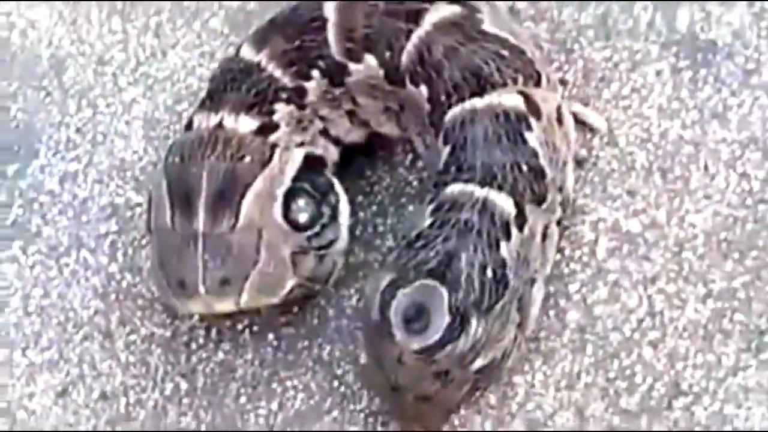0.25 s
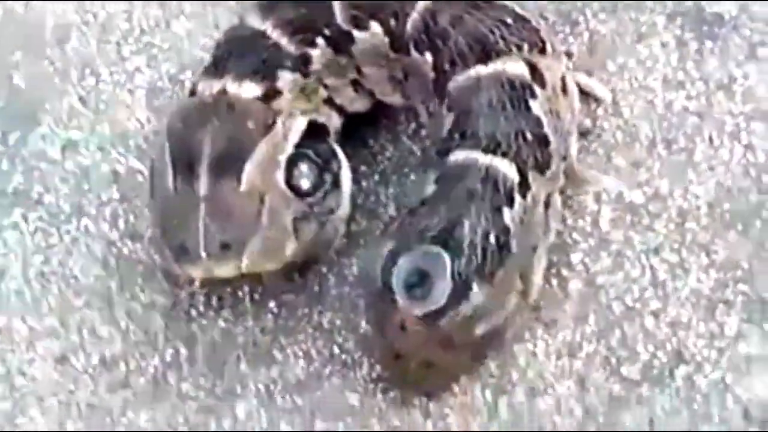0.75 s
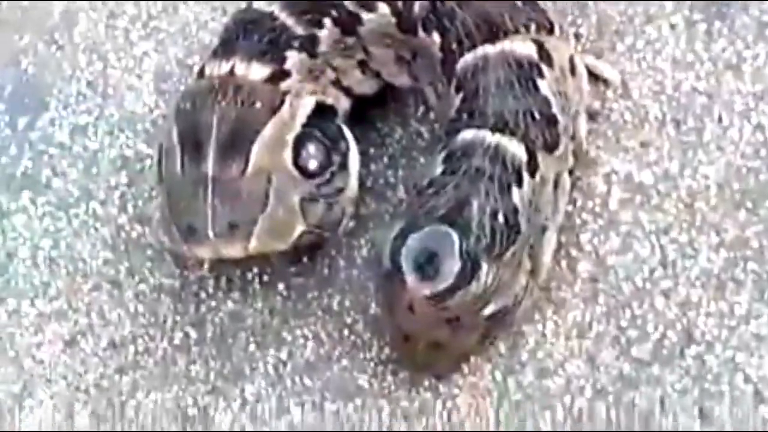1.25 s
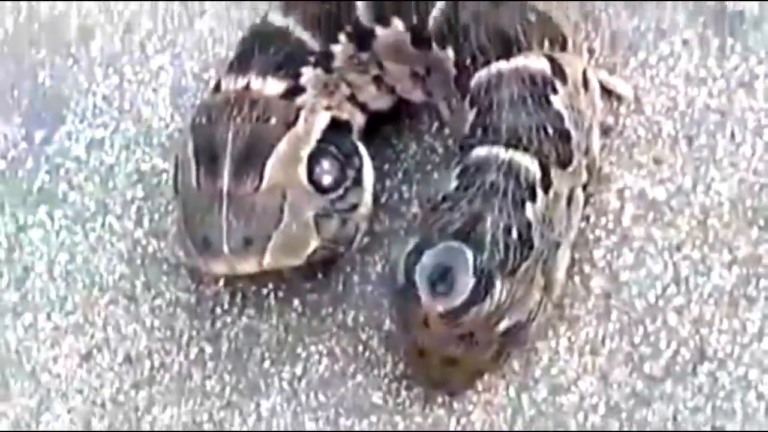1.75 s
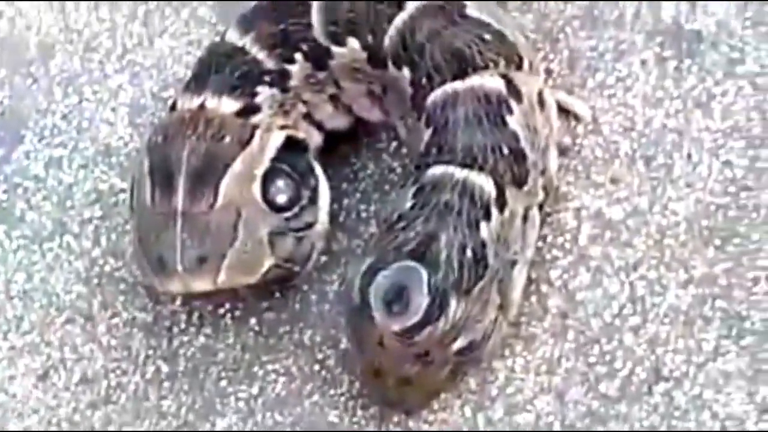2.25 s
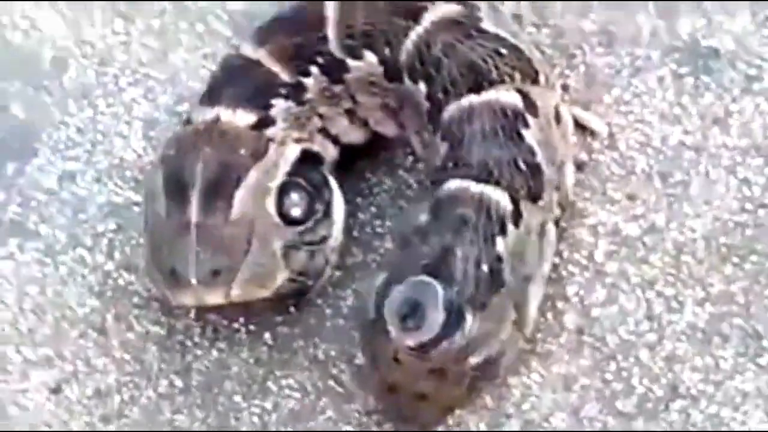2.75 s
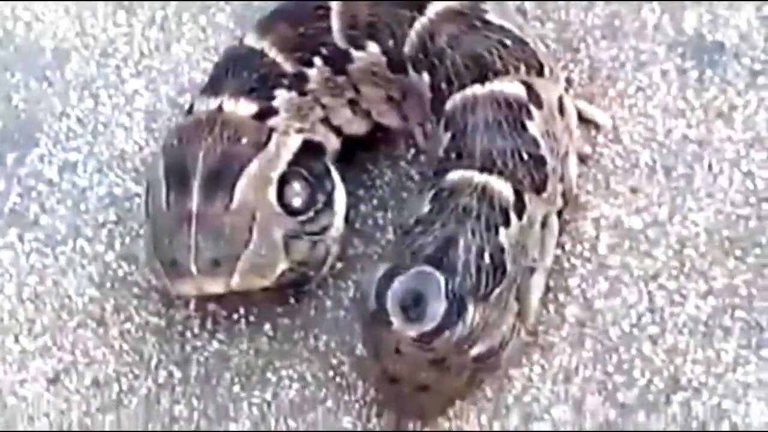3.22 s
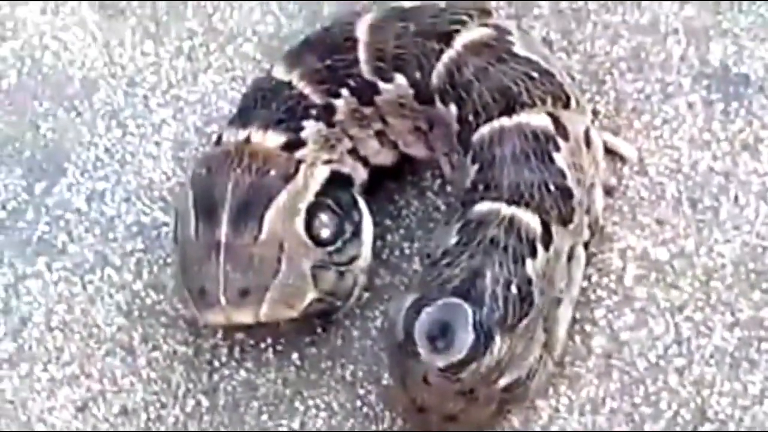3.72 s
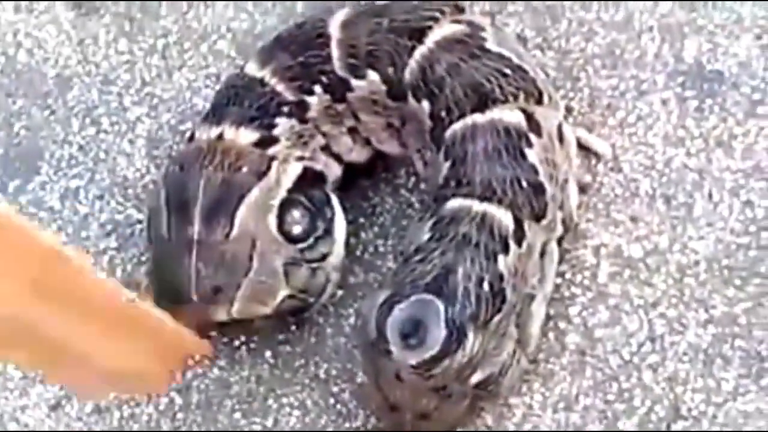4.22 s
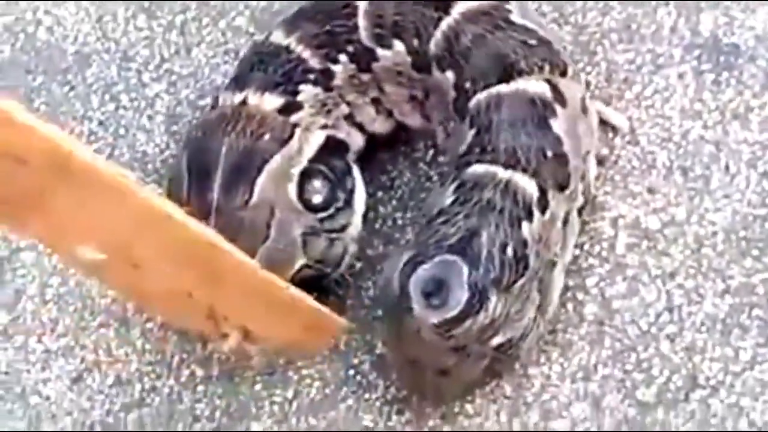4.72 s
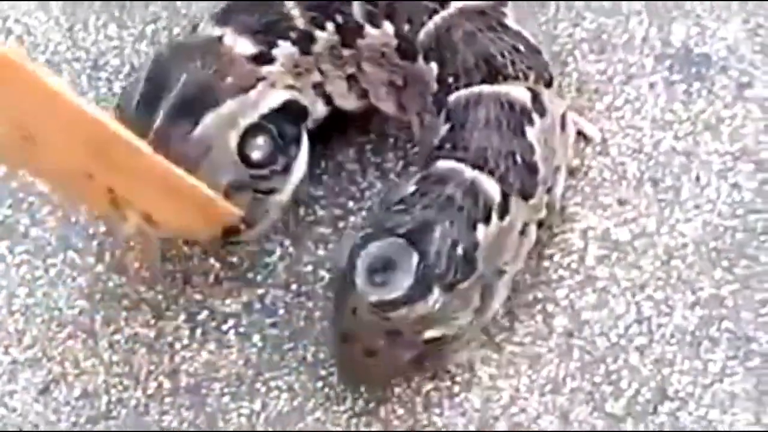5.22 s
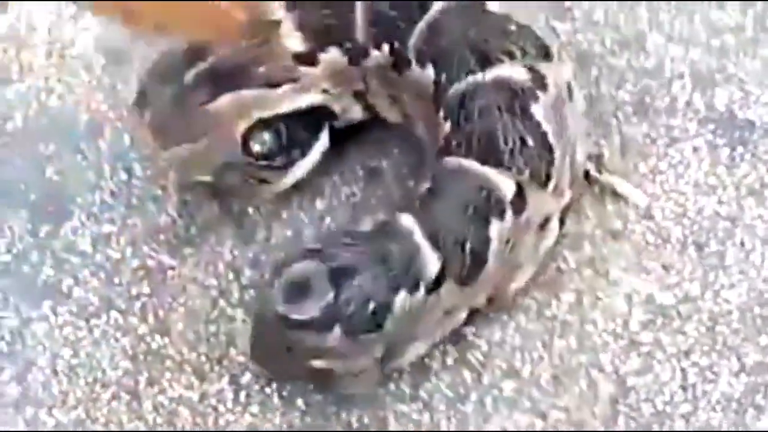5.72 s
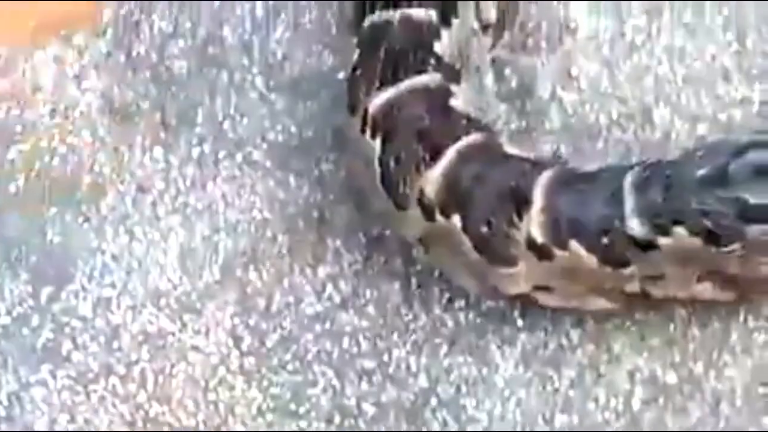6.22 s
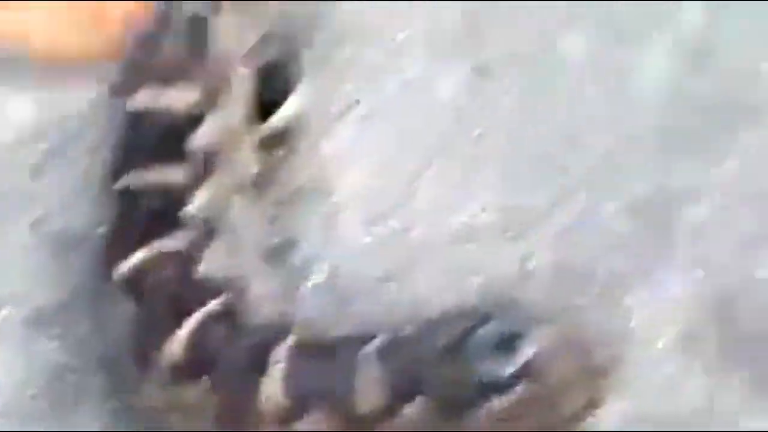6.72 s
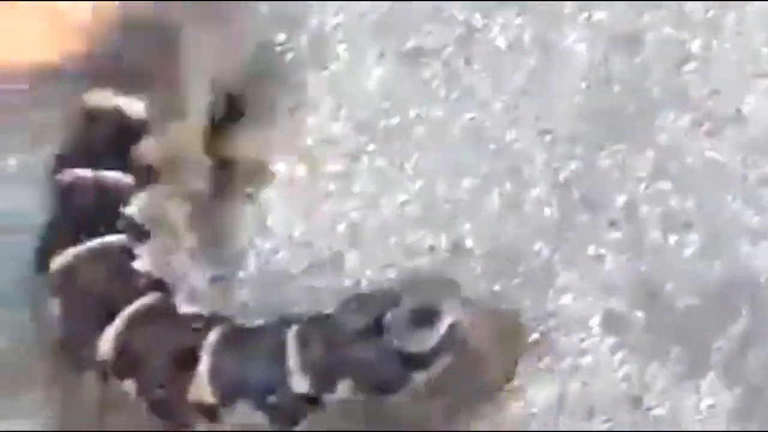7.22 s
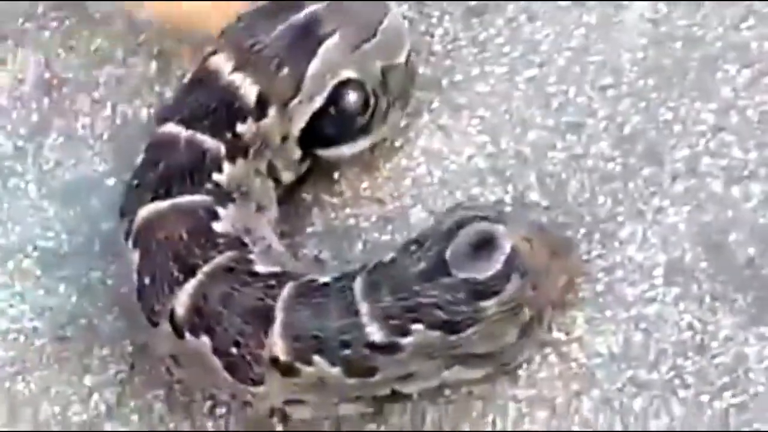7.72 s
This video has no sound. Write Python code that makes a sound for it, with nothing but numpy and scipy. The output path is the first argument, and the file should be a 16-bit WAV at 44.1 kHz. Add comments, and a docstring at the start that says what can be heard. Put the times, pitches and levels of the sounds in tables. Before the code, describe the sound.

Slow irregular knocks, like hard soles or a stick striking rough concrete, stand out sharply from a nearly silent low hum. The first comes immediately, with light taps after it; the strongest is near the middle and the weakest about six seconds in. Fine grit crackles around two seconds, and bright scraping ticks follow the last knock. One near microphone catches short hard-walled reverberation.

```python
"""Over a faint low hum and thin hiss, hard soles land slowly and unevenly on gritty concrete in a bare room.
A few milliseconds of faint grainy noise lead into each heel knock, a short dead ring of coloured noise, and
the flat of the sole slaps after it. The room answers with scattered echoes and a noise tail, and its lowest
mode booms on as a decaying sine. Light taps fall among the steps; scrapes and ticks of filtered noise grains,
then faint squeaks, join in."""
import sys
import numpy as np
from scipy import signal
from scipy.fft import rfft, irfft, next_fast_len
from scipy.io import wavfile
from scipy.ndimage import uniform_filter1d

SR = 44100
rng = np.random.default_rng(int(sys.argv[2]) if len(sys.argv) > 2 else 0)


def unload_wav(signal):
    """Save mono or channel-first audio to the path in sys.argv[1] as 16-bit WAV at rate SR, clipped to [-1, 1]."""
    wavfile.write(
        sys.argv[1],
        SR,
        np.round(np.clip(np.atleast_2d(signal).T, -1, 1) * 32767).astype(np.int16),
    )


N = 351029

# Steps, heel first and then the flat of the sole. Each row: heel start in seconds, heel level in dB,
# hollow note in Hz, heel bass lift in dB, heel treble lift in dB, heel t60 in seconds, sole lag in seconds,
# sole level over the heel in dB, lead-in noise level in dB before its fades, room boom in dB before its trim.
STEP_ROWS = [(0.0005, 15.5, 285, -0.5, 1.5, .045, .011, -6.5, -48, -41),
             (1.231, 17.5, 280, 0.5, 3.5, .038, 0.013, -15, -48.5, -36.5),
             (1.993, 12, 480, 7.5, -2, 0.048, .016, -1, -36, -45.5),
             (3.3796, 22.5, 660, -0.5, -0.5, .031, .016, -15, -52.5, -34),
             (4.186, 16.5, 470, 1, -2.5, .055, .013, -5, -36.5, -50.5),
             (5.403, 15.5, 565, 0, 2, .045, .014, -7.5, -38.5, -36.5),
             (6.167, 2.5, 180, 7.5, 4.5, 0.061, .008, -3.5, -45.5, -55.5),
             (7.405, 11, 380, 5.5, 1, 0.061, .026, -7.5, -65.5, -41)]
BOOM_HZ = 36.7  # the room's lowest mode


def amp(db):
    """Linear gain of a level in dB."""
    return 10 ** (np.asarray(db) / 20)


def unit(x):
    """Scale x to an rms of 1."""
    return x / np.sqrt(np.mean(x ** 2) + 1e-20)


def burst(x):
    """Scale x so that its loudest 4 ms have rms 1."""
    loudest_power = uniform_filter1d(x ** 2, size=176, mode="constant").max()
    return x / np.sqrt(loudest_power + 1e-20)


def along(points, hz):
    """Read a curve of (Hz, value) points on a log frequency axis."""
    point_hz, values = np.transpose(points)
    return np.interp(np.log(hz + 1), np.log(point_hz), values)


def add(track, s, x):
    """Mix x into the track from second s on."""
    start = max(round(s * SR), 0)
    track[start:start + len(x)] += x[:N - start]


def band(x, low_hz, high_hz, order=2):
    """Causal band-pass."""
    edges = [min(low_hz, SR / 3), min(high_hz, SR * .45)]
    return signal.sosfilt(signal.butter(order, edges, "bandpass", fs=SR, output="sos"), x)


def spread_to(x, level_db, span):
    """Causal colouring that brings the spectrum of x to level_db(hz); peaks narrower than span x frequency stay."""
    size = 16384
    spectrum, hz = rfft(x, size), np.fft.rfftfreq(size, 1 / SR)
    bins = np.arange(len(hz))
    reach = (16 + span * bins).astype(int)
    low, high = np.maximum(bins - reach, 0), np.minimum(bins + reach, bins[-1])
    power = np.cumsum(np.abs(spectrum) ** 2)
    broad = np.sqrt((power[high] - power[low]) / (high - low) + 1e-9)  # mean over neighbouring frequencies
    # folding the cepstrum forward in time makes the filter minimum phase
    cepstrum = irfft(np.log(amp(level_db(hz)) / broad))
    cepstrum[1:size // 2] *= 2
    cepstrum[size // 2:] = 0
    return irfft(spectrum * np.exp(rfft(cepstrum)))[:size // 2]


def background():
    """Noise shaped into low rumble and thin hiss, with a narrow band at the lowest mode as an unsteady hum."""
    # The quiet floor's colour. Each row: frequency in Hz, relative spectral level in dB.
    hush_colour = [(15, -13), (28, -4), (42, -4.5), (62, -9.5), (100, -16.5), (200, -20.5), (320, -20.5),
                   (450, -29.5), (900, -34), (2200, -43.5), (6000, -45), (15000, -46.5)]
    hz = np.fft.rfftfreq(N, 1 / SR)
    hush = unit(irfft(rfft(rng.standard_normal(N)) * amp(along(hush_colour, hz)), N))
    resonance = 1 / (1 + ((hz - BOOM_HZ) / 3) ** 2)
    hum = unit(irfft(rfft(rng.standard_normal(N)) * resonance, N))
    return amp(-68) * hush + amp(-70.5) * hum


def body_db(hz):
    """The lift that the resonances of sole and floor give to every contact."""
    # Resonances of sole and floor. Each row: centre in Hz, width in Hz, lift in dB.
    resonances = [(158, 18, 1.5), (330, 45, 4.5), (532, 37, 4), (786, 60, 1), (1090, 150, 2.5),
                  (1395, 83, 3), (1690, 970, 2.5), (2017, 45, 4.5), (2340, 44, 2.5), (3740, 600, 0.5),
                  (8200, 3000, 3.5)]
    return sum(db / (1 + (2 * (hz - centre) / width) ** 2) for centre, width, db in resonances)


def room(x):
    """The room's answer: a scatter off the near walls, and a tail whose treble dies first."""
    # How long the room rings. Each row: frequency in Hz, t60 in seconds.
    ring_times = [(60, .55), (250, .51), (600, .49), (1500, .45), (4000, .40), (8000, .34), (14000, .26)]
    hz, t, z = signal.stft(rng.standard_normal(SR * 3 // 4), SR, nperseg=256)
    decay = amp(-60 * t / along(ring_times, hz)[:, None])
    tail = signal.istft(z * decay, SR, nperseg=256)[1]
    t = np.arange(len(tail)) / SR
    tail *= 1 - np.exp(-t / 0.0023)
    sparse = (rng.random(len(t)) < .03) * (t > .004)  # few echoes, none in the first 4 ms
    walls = rng.standard_normal(len(t)) * sparse * amp(-60 * t / 0.1)
    answer = tail / np.linalg.norm(tail) + amp(-4) * walls / np.linalg.norm(walls)
    return signal.fftconvolve(x, answer)


def grit(x, centre_hz):
    """Grainy noise takes a broad hump, tinted by the same resonances as the blows."""
    # The colour of crushed grains. Each row: octaves from the centre, level in dB before the treble loss.
    grain_hump = [(-6, -32), (-3, -12), (-1.5, -2), (-.3, 0), (.4, -3), (1.2, -14), (2.5, -27)]

    def colour_db(hz):
        hump_db = np.interp(np.log2((hz + 1) / centre_hz), *np.transpose(grain_hump))
        treble_loss_db = 8 * (hz / 16000) ** 4
        return np.maximum(hump_db - treble_loss_db, -60) + body_db(hz)

    return spread_to(x, colour_db, span=0.1)[:len(x)]


def grainy_noise(length, db, hz):
    """Sparse noise grains of very uneven size, in clumps, fade in and out and excite the room."""
    count = int(length * SR)
    # the clumps swell and thin on a curve with 300 random points a second
    clumps = np.interp(np.arange(count) / SR * 300, np.arange(64), rng.standard_normal(64))
    grains = rng.standard_normal(count) * (rng.random(count) < .25)
    grains *= amp(2.5 * rng.exponential(size=count) + 3.8 * clumps)
    dry = amp(db) * unit(grit(grains, hz)) * np.sqrt(np.hanning(count))
    sound = amp(-10.0) * room(dry)
    add(sound, 0, dry)
    return sound


def knock(db, hollow_hz, bass_db, treble_db, t60):
    """A rough contact rings the body's resonances; how it lands sets its hollow note, bass and treble."""
    # The basic colour of a contact. Each row: frequency in Hz, level in dB.
    contact_colour = [(160, -0.5), (330, 0.5), (620, -0.5), (1700, -10), (6500, -22)]
    # Every blow thins out at both ends. Each row: frequency in Hz, level in dB.
    end_loss = [(25, -18), (55, -7), (90, -5.5), (140, -1.5), (6500, -2), (9300, -7), (12000, -11.5),
                (16000, -25.5)]
    # How much of the bass or treble lift each frequency takes. Each row: frequency in Hz, share of the lift.
    bass_share = [(180, 0.94), (330, .5), (600, 0.074)]
    treble_share = [(700, 0.053), (1800, 0.9), (5000, .85), (11000, 1.25)]
    t = np.arange(SR // 6) / SR
    # a duller contact is a softer one: its 1 ms build-up doubles for every 8 dB of treble lost
    build_s = .001 * 2 ** (-treble_db / 8)
    crunch = rng.standard_normal(len(t)) * amp(-60 * t / t60) * (1 - np.exp(-t / build_s))

    def colour_db(hz):
        # the hollow under the sole lifts its note by 5.5 dB, with a half width of 0.22 octaves
        hollow_db = 5.5 / (1 + (np.log2((hz + 1) / hollow_hz) / 0.22) ** 2)
        tilt_db = bass_db * along(bass_share, hz) + treble_db * along(treble_share, hz)
        fixed_db = along(contact_colour, hz) + along(end_loss, hz) + body_db(hz)
        return db + hollow_db + tilt_db + fixed_db

    # the room gathers sound from all directions, which evens out the narrow peaks
    sound = amp(-9) * room(spread_to(crunch, colour_db, span=0.014))
    add(sound, 0, spread_to(crunch, colour_db, span=0.14))
    return sound


def steps():
    """Faint grainy noise leads into each heel knock, then the sole slaps; one-piece taps fall in between."""
    # Light taps. Each row: start in seconds, level in dB, hollow note in Hz, bass lift in dB, treble lift in dB.
    tap_rows = [(.0435, 7.5, 800, 2, 0.5), (.0763, 1.5, 269, 1.5, 5), (1.5089, 15.5, 570, -8, -15),
                (2.038, 6.5, 360, 0, -6), (6.3283, -2, 426, -2.5, -2)]
    lead_in_s, lead_in_hz = 0.0055, 2800  # length, centre
    sole_bass_db, sole_treble_db = -3.5, 1.5
    sole_t60_s, tap_t60_s = .05, .024
    track = np.zeros(N)
    for s, db, hollow_hz, bass_db, treble_db, heel_t60, lag, sole_db, lead_in_db, _ in STEP_ROWS:
        add(track, s - lead_in_s, grainy_noise(lead_in_s, lead_in_db, lead_in_hz))
        add(track, s, knock(db, hollow_hz, bass_db, treble_db, heel_t60))
        slap = knock(db + sole_db, hollow_hz, sole_bass_db, sole_treble_db, sole_t60_s)
        add(track, s + lag, slap)
    for s, *landing in tap_rows:
        add(track, s, knock(*landing, tap_t60_s))
    return track


def boom():
    """The room's lowest mode swells after each step's heel and rings on, among weaker neighbours."""
    track, t = np.zeros(N), np.arange(2 * SR) / SR
    decay = amp(-60 * t / 1.2)
    swell = (1 - np.exp(-t / 0.045)) * decay
    mode = swell * np.sin(2 * np.pi * BOOM_HZ * t)
    for s, *_, db in STEP_ROWS:
        neighbours = unit(band(rng.standard_normal(len(t)), 16, 56)) * decay
        add(track, s, amp(db - 0.5) * (mode + amp(-8) * neighbours))
    return track


def scuffs():
    """A sliding sole catches and slips, crushing grit that scrapes as clumped noise grains."""
    # Drags. Each row: start in seconds, length in seconds, level in dB before the fades, centre in Hz.
    drag_rows = [(.051, .010, -43, 7190), (0.119, .036, -41.5, 7800), (1.136, .095, -63, 2295),
                 (1.255, .02, -44, 9500), (1.971, .032, -42, 2300), (2.213, .15, -51.5, 1390),
                 (3.312, .022, -59, 1400), (3.345, .034, -60.5, 2200), (5.297, .14, -67, 1800),
                 (6.159, .022, -39.5, 9000), (6.214, .016, -45, 12500), (7.403, .036, -36.5, 7500),
                 (7.427, .027, -30, 11000)]
    track = np.zeros(N)
    for s, length, db, hz in drag_rows:
        add(track, s, grainy_noise(length, db, hz))
    return track


def loose_grains(start, length, db, hz, count):
    """Rows (s, dB, centre Hz) of grains that snap at uneven moments through a stretch."""
    times = start + length * (np.arange(count) + rng.random(count)) / count
    size, pitch = rng.standard_normal((count, 2)).T
    # grains scatter by 2.5 dB in level and 0.35 octaves in pitch
    return list(zip(times, db + 2.5 * size, hz * 2 ** (.35 * pitch)))


def ticks():
    """Single grains snap in a few milliseconds, each a decaying noise burst with the room's answer."""
    # Single snaps. Each row: start in seconds, level in dB, centre in Hz.
    snap_rows = [(.3885, -70, 6950), (.534, -65, 1390), (.936, -70.5, 1480), (1.045, -66, 1380),
                 (1.216, -49.5, 1790), (1.3935, -57, 8500), (1.778, -60, 2275), (2.297, -54, 4500),
                 (2.374, -51.5, 4080), (2.445, -55, 2030), (2.577, -66.5, 1500), (2.692, -69, 1800),
                 (2.85, -64.5, 2370), (3.208, -61, 1570), (4.4331, -51, 4490), (4.733, -66, 1250),
                 (5.348, -58.5, 1106), (5.368, -57.5, 5000), (5.6186, -50.5, 4930), (5.786, -61.5, 3980),
                 (5.8475, -49.5, 3420), (5.952, -61, 990), (6.203, -42.5, 10000), (6.976, -68, 894),
                 (7.112, -63, 2606), (7.4885, -37.5, 10990), (7.5188, -36.5, 7900)]
    track, t = np.zeros(N), np.arange(SR // 25) / SR
    # loose grains crackle while the sole twists; strays snap under the shifting weight
    twist = loose_grains(2.188, .19, db=-60, hz=5200, count=12)
    strays = loose_grains(0, N / SR, db=-78, hz=1390, count=16)
    envelope = amp(-60 * t / 0.0086) * (1 - np.exp(-t / .0005))
    for s, db, hz in list(snap_rows) + twist + strays:
        snap = amp(db) * burst(grit(rng.standard_normal(len(t)) * envelope, hz))
        add(track, s, snap)
        add(track, s, amp(-11) * room(snap))
    return track


def squeaks():
    """The rubbing sole squeaks faintly: narrow bands of noise that fade in and out."""
    # Squeaks. Each row: start in seconds, length in seconds, level in dB before the fades, centre in Hz.
    squeak_rows = [(1.14, .09, -68, 1900), (7.151, 0.21, -79.5, 1340)]
    width_hz = 160
    track = np.zeros(N)
    for s, length, db, hz in squeak_rows:
        rub = band(rng.standard_normal(int(length * SR)), hz - width_hz / 2, hz + width_hz / 2)
        add(track, s, amp(db) * unit(rub) * np.sqrt(np.hanning(len(rub))))
    return track


def scene():
    """Background, steps, the room's boom, grit and squeaks at one microphone."""
    return (background() + steps() + boom() + scuffs() + ticks() + squeaks())[None]


def record(dry):
    """The recorder keeps nothing above its band limit."""
    top_hz = 16050
    size = next_fast_len(N + SR)
    kept = np.fft.rfftfreq(size, 1 / SR) < top_hz
    return irfft(rfft(dry, size) * kept, size)[:, :N]


dry = scene()
out = record(dry)
unload_wav(out)
```